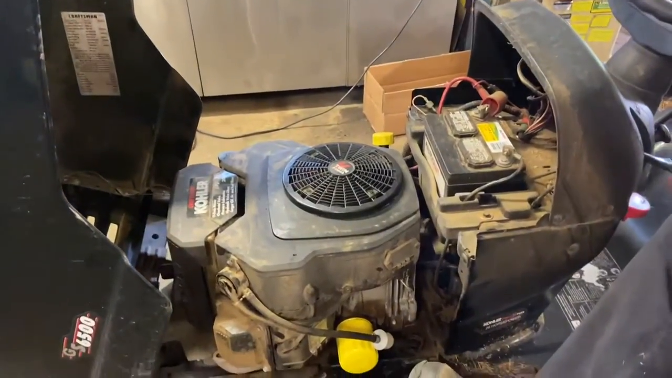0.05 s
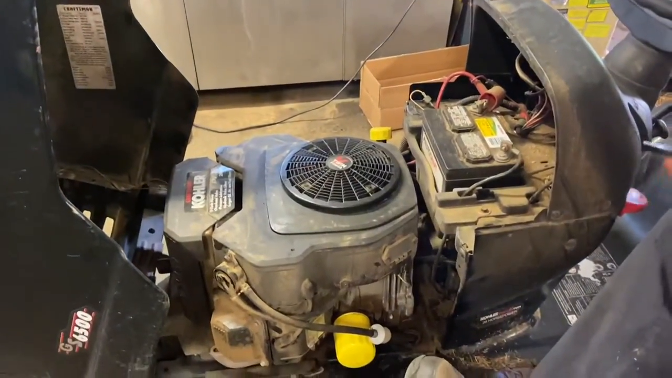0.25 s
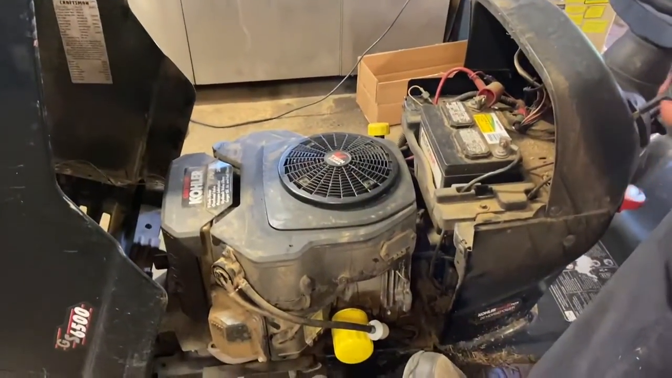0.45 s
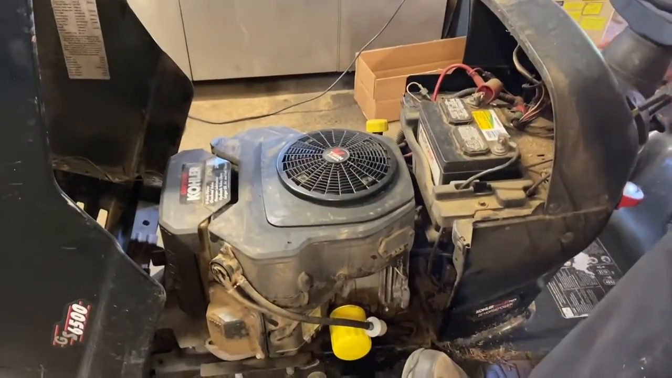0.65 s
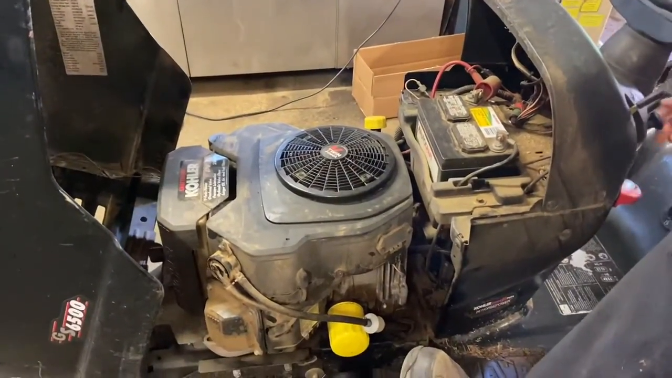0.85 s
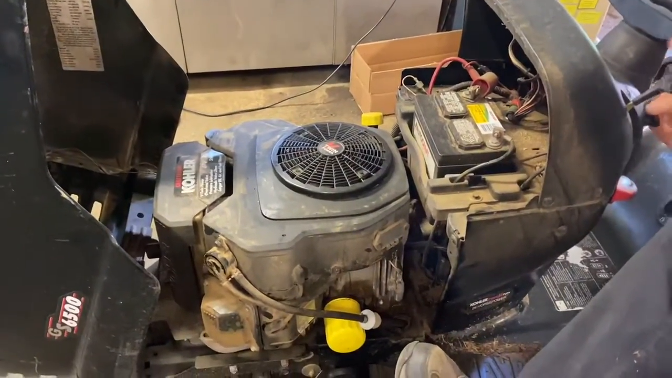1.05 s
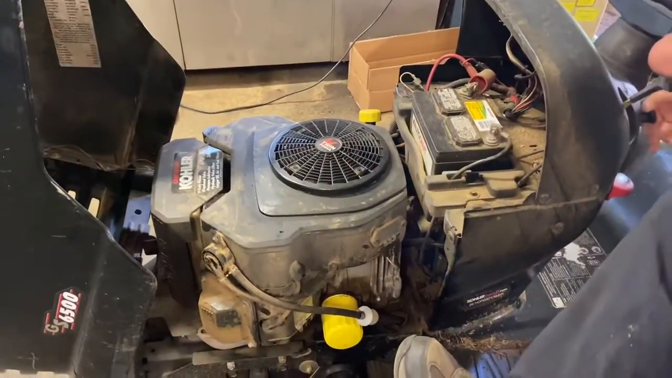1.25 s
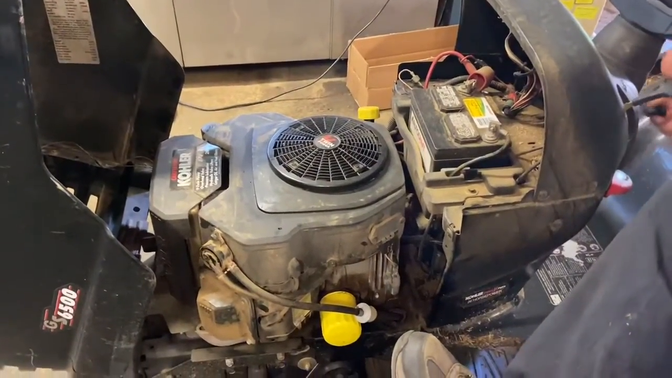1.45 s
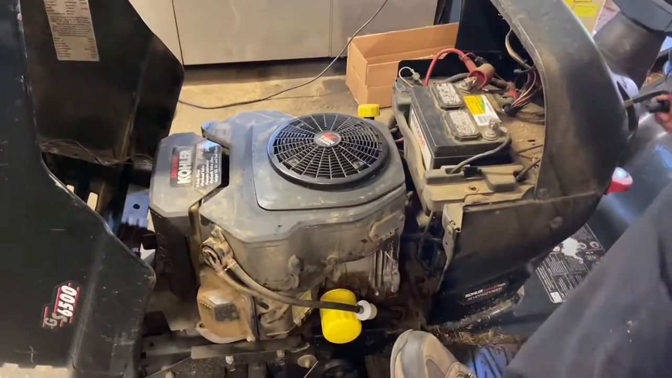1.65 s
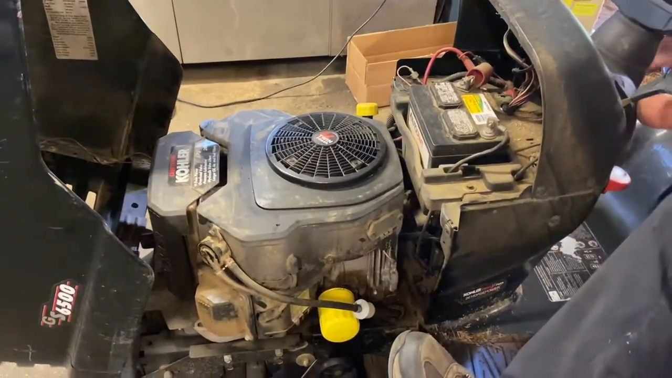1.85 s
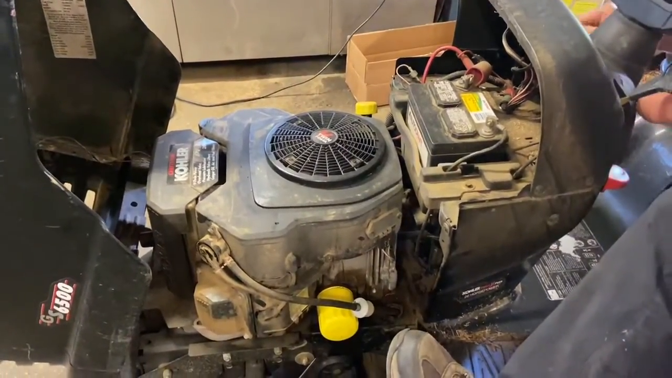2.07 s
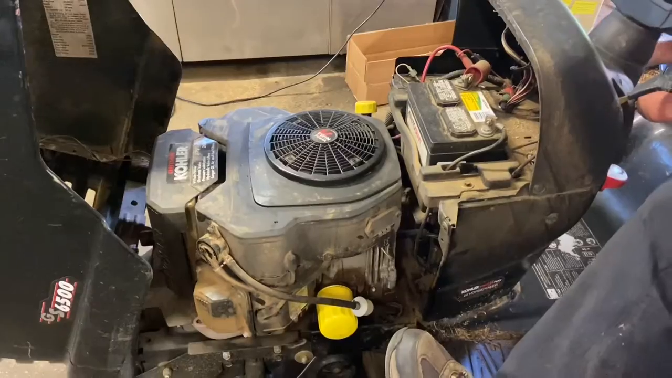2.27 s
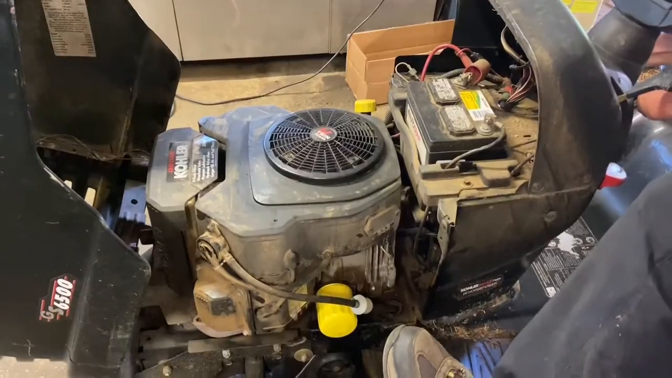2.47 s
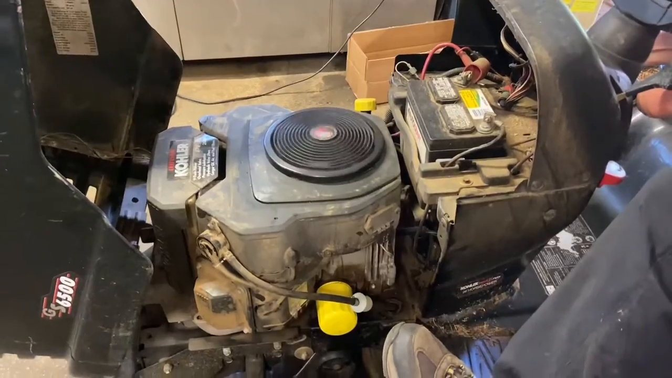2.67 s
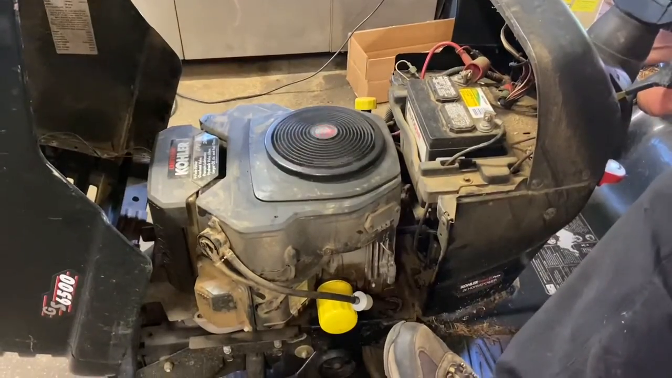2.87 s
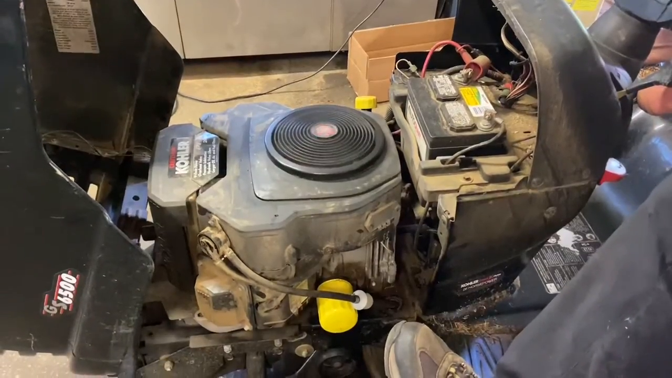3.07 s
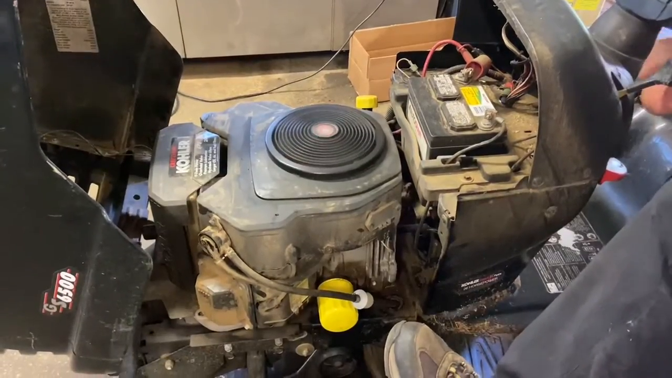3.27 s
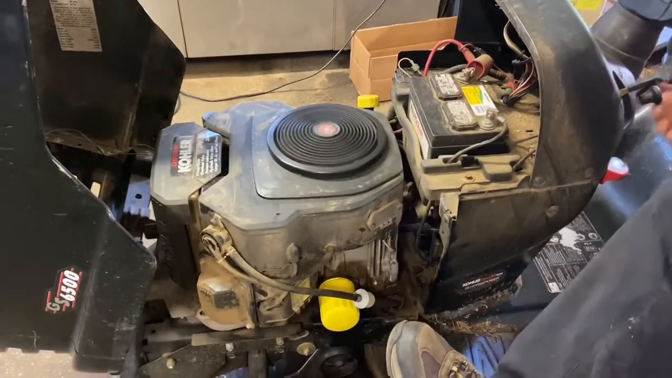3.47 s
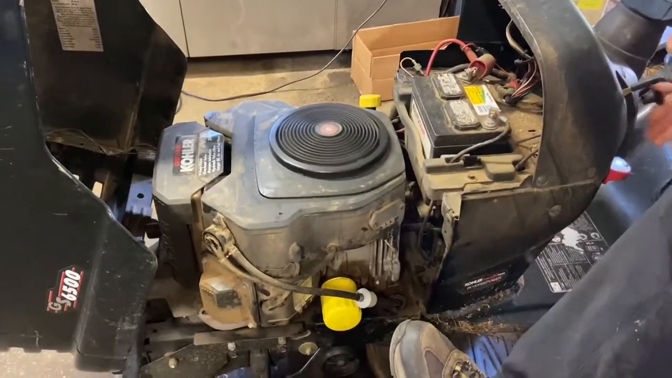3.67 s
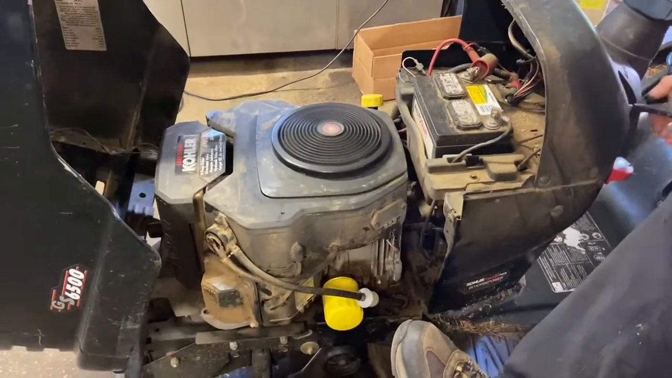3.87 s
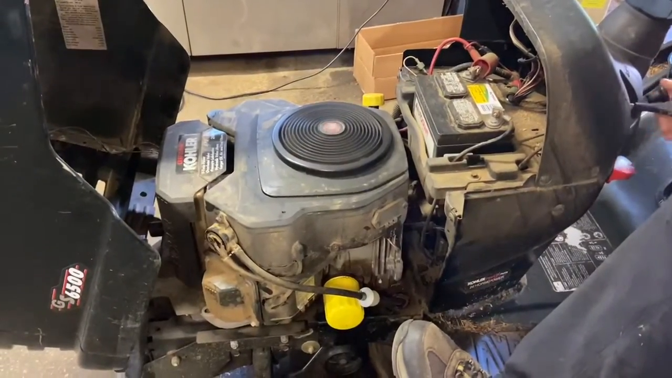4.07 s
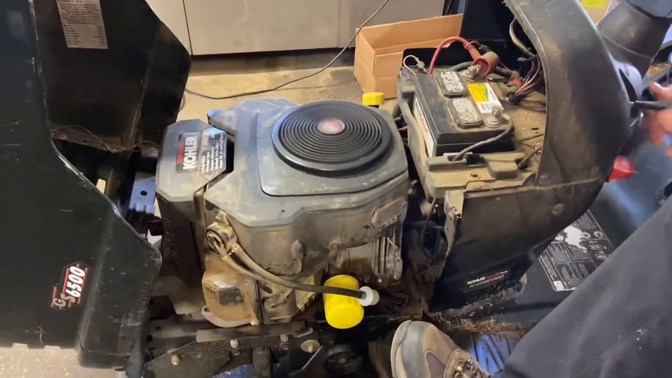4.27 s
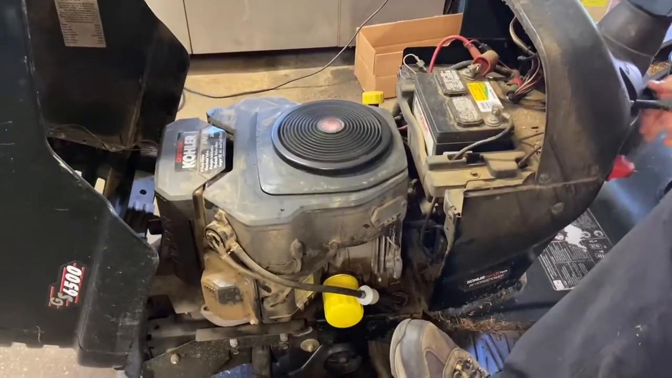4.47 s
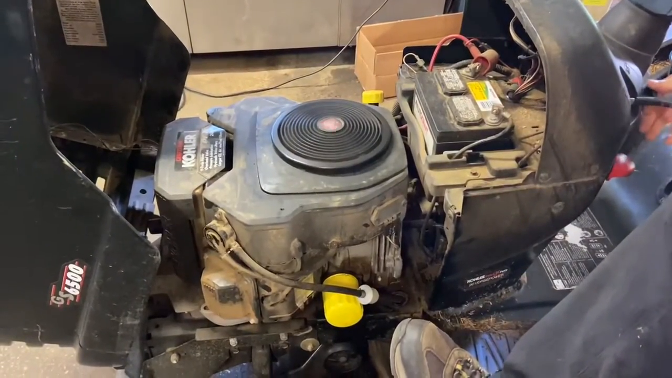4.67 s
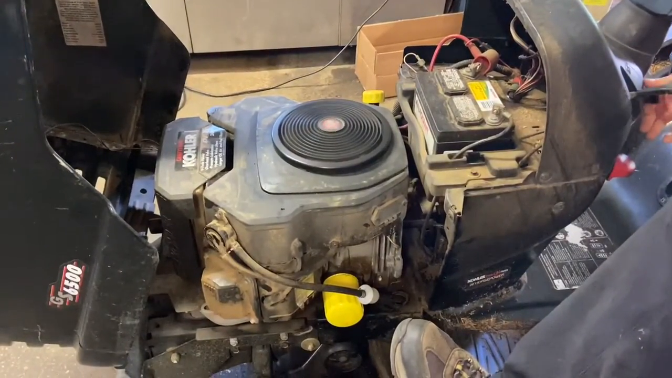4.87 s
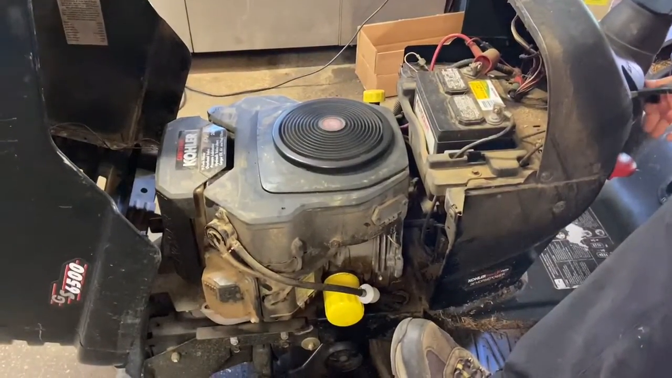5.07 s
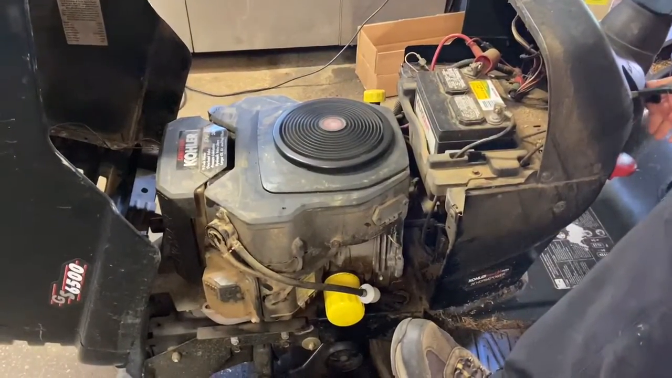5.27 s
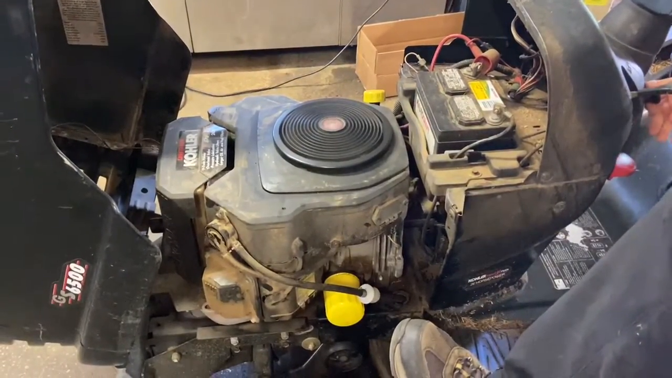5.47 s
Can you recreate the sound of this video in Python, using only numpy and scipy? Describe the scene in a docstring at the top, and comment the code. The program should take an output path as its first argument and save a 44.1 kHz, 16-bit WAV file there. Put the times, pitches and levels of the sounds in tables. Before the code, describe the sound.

After light metal clanks, a riding mower's starter grinds and the engine fires, sags to slow thumps, then speeds up and runs steadily.

```python
"""In a workshop, a V-twin lawn tractor is started, heard from just above the open engine.
Levers and pedal clank, exciting the modes of the frame. The starter's pinion grinds on the ring gear and
rings the flywheel until the engine catches and throws it out. The engine stumbles, slows in separate
thumps with the throttle shut, then the governor opens up, a belt chirps and it runs steadily: pressure
pulses drive the tailpipe, muffler and air box, and valve taps ring the block."""
import sys
import numpy as np
from scipy import signal
from scipy.fft import rfft, irfft
from scipy.io import wavfile
from scipy.ndimage import uniform_filter1d

SR = 44100
rng = np.random.default_rng(int(sys.argv[2]) if len(sys.argv) > 2 else 0)


def log_audio(samples):
    """Write samples as a 16-bit WAV file to the path given in sys.argv[1]."""
    # one column per channel
    frames = np.atleast_2d(samples).T
    # limit to full scale, then quantise
    limited = np.clip(frames, -1, 1)
    pcm = np.round(limited * 32767).astype(np.int16)
    wavfile.write(sys.argv[1], SR, pcm)


N = 243431
T = np.arange(N) / SR
FREQS = np.maximum(np.arange(4097) * SR / 8192, 1)  # frequency axis of all gain curves [Hz]

# Engine speed, `hz` below, counts four-stroke cycles per second. The pinion slips above FREEWHEEL_HZ.
CRANK_HZ, FREEWHEEL_HZ, RUN_HZ = 4, 6.6, 18
PINION_IN_S, PINION_OUT_S = 2.369, 3.2

# Body of the engine block's sound: (frequency [Hz], relative gain [dB])
BLOCK_BODY = [(180, -9), (300, -3.5), (350, -10.5), (428, -4), (525, -8), (756, -8), (1000, -9),
              (1170, -10.5), (1320, -7.5), (1500, -14), (1680, -10), (2120, -16.5), (2310, -16),
              (3000, -26), (3900, -27), (6600, -120)]
# Treble of the engine block's sound: (frequency [Hz], relative gain [dB])
BLOCK_TREBLE = [(2000, -4.5), (2800, -3), (4000, -2.5), (5200, -2), (6200, -1), (7300, -1.5), (10500, -1),
                (15500, -1)]


def exhaust(cycle, hz, throttle, burn, lit):
    """Pulse excitation: two unevenly spaced cylinders drive the tailpipe, muffler and air box."""
    # Strength of the firings at the tailpipe: (time [s], level [dB])
    firing_levels = [(2.85, -36), (2.92, -13), (3.25, -14), (3.42, -10), (3.71, -8.5), (3.76, -18),
                     (4.32, -15), (4.52, -23), (4.6, -15), (4.74, -10.5), (5.52, -12)]
    # Response of the hot muffler: (frequency [Hz], relative gain [dB])
    muffler = [(25, -60.5), (50, -41), (80, 1.5), (108, 6), (155, -3), (198, -0.5), (218, -5), (250, 8),
               (280, -4.5), (325, -10), (370, -16), (425, -14), (600, -19.5), (1200, -35.5)]
    second_phase, pipe_delay_s = .634, 0.00317  # lag of cylinder two [cycles] and of the muffler
    cool_hz, cool_ratio = 12.8, .93  # below this speed, cooler gas lowers the resonances by this ratio
    # a rich mixture makes the second cylinder drop out
    stumble = ramp(3.42, 0.04) - ramp(3.78, 0.04)
    second_db = -2 - 28 * stumble
    # once the governor settles, the air box calms and the leaner mixture quickens the puffs
    settled = ramp(4.79, 0.15)
    throb_db = loudness(hz, throttle, idle_db=-26.5, doubling_db=5.5, drive_db=5.5) - 6 * settled
    bark_db = loudness(hz, burn, idle_db=-36.5, doubling_db=1.5, drive_db=12) - 0.5 * settled
    puff_hz = 124.5 * (np.maximum(hz, FREEWHEEL_HZ) / RUN_HZ) ** 0.11 * (1 + .28 * settled)
    puff_db = curves(firing_levels)[0] - 4 * (1 - lit)
    tailpipe = puffs(cycle, puff_hz, puff_db) + puffs(cycle - second_phase, puff_hz, puff_db + second_db)

    pulse_gain = np.sqrt(SR / np.maximum(hz, 3))  # keeps power independent of pulse rate
    first, second = ticks(cycle, scatter_db=.4), ticks(cycle - second_phase, scatter_db=.5)
    firings = (first + undb(second_db) * second) / np.sqrt(1 + undb(second_db) ** 2)
    cool = shape(np.array(muffler) * [cool_ratio, 1])
    heat = np.clip((hz - cool_hz) / (RUN_HZ - cool_hz), 0, 1)
    bark = morph(-firings * pulse_gain * undb(bark_db), cool, shape(muffler), heat)
    bark = np.interp(T - pipe_delay_s, T, bark)

    pumping = first + undb(0.26 * second_db) * second  # only partly follows the dropout
    air_box = resonances([(74, 29, 0)]) ** 2
    throb = colour(-pumping * pulse_gain * undb(throb_db), air_box)
    return workshop(tailpipe + bark + throb, wet_db=-15)


def puffs(turns, pitch_hz, db):
    """Radiation from an open pipe: one short swing of pressure at every whole turn."""
    delay_s, width_periods, scatter_db = 0.0037, 0.91, 1.2
    out = np.zeros(N)
    age = np.arange(-SR // 50, SR // 50) / SR
    for i in np.flatnonzero(np.diff(np.floor(turns)) > 0):
        periods = pitch_hz[i] * (age - delay_s)
        puff = np.cos(2 * np.pi * periods) * np.exp(-(periods / width_periods) ** 2)
        puff *= undb(db[i] + scatter_db * rng.standard_normal())
        start = i - len(age) // 2
        out[start:start + len(age)] += puff[:N - start]
    return out


def ignition():
    """Incomplete combustion: the share of the charge that lights is 1, except at two misfires."""
    misfires_s, width_s, depth = (3.44, 3.545), 0.047, 0.88
    return 1 - depth * sum(np.exp(-((T - s) / width_s) ** 4) for s in misfires_s)


def valve_gear(cycle, hz, charge, burn):
    """Impact and flow noise: four taps a cycle ring block and covers; gas rushes with each cylinder."""
    # Swells of the gas flow: (phase [cycles], rise [dB])
    gusts = [(.04, 7), (.66, 5.5)]
    # Modes of the valve covers and shroud: (frequency [Hz], bandwidth [Hz], level [dB])
    cover_modes = [(1342, 41, -7), (1421, 33, -1.5), (1642, 42, -11.5), (2235, 31, -11)]
    tap_phases, shake_decay_s, gust_sharpness = (.11, .29, .57, .73), .006, 1.7
    clatter_db = loudness(hz, burn, idle_db=-32, doubling_db=2.5, drive_db=3.5)
    hiss_db = loudness(hz, charge, idle_db=-41, doubling_db=10, drive_db=11.5)
    spun_up = np.clip(hz / 11, 0, 1) ** 2
    taps = sum(ticks(cycle - phase, scatter_db=3.5) for phase in tap_phases)
    shake = 1 + 0.72 * signal.lfilter([1], [1, -np.exp(-1 / (shake_decay_s * SR))], taps)
    rush = undb(sum(db * np.exp(gust_sharpness * (np.cos(2 * np.pi * (cycle - phase)) - 1))
                    for phase, db in gusts))
    shake, rush = (spun_up * v / np.mean(v[T > PINION_OUT_S]) for v in (shake, rush))

    def face():
        """Incoherent radiation: each face of the engine gives its own grainy noise."""
        grit = undb(3.5 * np.repeat(rng.standard_normal(N // 40 + 1), 40)[:N])
        body = colour(unit(noise() * grit) * shake * undb(clatter_db), shape(BLOCK_BODY))
        hiss = colour(unit(noise() * grit) * rush * undb(hiss_db), shape(BLOCK_TREBLE))
        return body + hiss

    blows = spun_up * taps * np.sqrt(SR / (len(tap_phases) * np.maximum(hz, 1)))
    covers = np.zeros(N)
    for mode_hz, width, db in cover_modes:
        pings = np.sign(noise()) * blows * undb(clatter_db + db - 11.5)
        rocking = undb(2.5 * wander(seconds=0.06))  # the engine rocks on its mounts
        covers += colour(pings * rocking, resonances([(mode_hz, width, 0)]))
    top = workshop(face() + covers, wet_db=-5)
    flanks = np.array([face(), face()])  # one to each channel
    return top + undb(-2.5) * flanks


def hood_rattle():
    """Forced vibration: the hard firings of the stumble shake short, bright rattles from the hood."""
    # Jolts of the hood: (time [s], level [dB])
    jolts = [(3.258, -2.5), (3.33, -1.5), (3.362, -3.5), (3.381, -3.5), (3.482, 2), (3.588, -0.5),
             (3.641, 1), (3.691, 0.5)]
    s, db = np.transpose(jolts)
    shake = bursts(s, db, decays_s=0.0085)
    sheet_treble = shape([(2500, -9.5), (4500, -3.5), (8000, -1.0), (15000, 5)])
    body = colour(noise() * shake * undb(-18.5), shape(BLOCK_BODY))
    treble = colour(noise() * shake * undb(-13.5), sheet_treble)
    return workshop(body + treble, wet_db=-4)


def starter(cycle, hz):
    """Gear-mesh noise: pinion teeth strike and scrape the ring gear, slamming as the load reverses."""
    # Slams of the pinion: (time [s], level [dB], decay time [s], relative treble [dB])
    clashes = [(2.378, -10.5, 0.0063, -6), (2.408, -3.5, 0.005, -2), (2.547, -23, .005, -5),
               (2.79, -31, 0.0071, -6), (2.815, -32, 0.012, 13), (2.932, -27, .008, 7),
               (3.006, -11.5, 0.0048, 2), (3.121, -16, 0.0094, 0), (3.183, -14, 0.0065, -2)]
    # Spectrum of scraping teeth: (frequency [Hz], relative gain [dB])
    scrape_spectrum = [(2000, 12), (2800, -12), (3700, 9.5), (5600, 5), (6350, 10), (6650, 9.5),
                       (7100, 12.5), (8000, 1), (10500, -3), (15500, -4)]
    teeth_per_cycle = 190
    grind_db, scrape_db, brush_db = starter_load(hz)
    engaged = np.clip((T - PINION_IN_S) / 0.0013, 0, 1) * np.clip((PINION_OUT_S - T) / 0.0015, 0, 1)
    mesh_hz = teeth_per_cycle * np.maximum(hz, 2)
    # backlash lets each tooth land early or late, so the mesh grinds
    backlash = unit(uniform_filter1d(uniform_filter1d(noise(), 100), 100))
    teeth = ticks(teeth_per_cycle * cycle + .45 * backlash, scatter_db=3) * np.sqrt(SR / mesh_hz)
    chatter = flutter(spread_db=2, samples=220)  # the pinion moves in and out of contact
    mesh = (.5 * teeth + .75 * noise()) * chatter

    s, db, decay_s, treble_db = np.transpose(clashes)
    force = mesh * engaged * undb(grind_db) + noise() * bursts(s, db, decay_s)
    friction = unit(mesh * np.sqrt(chatter)) * engaged * undb(scrape_db + 2.5 * wander(seconds=.012))
    scrape = colour(friction, shape(scrape_spectrum))
    crack = noise() * bursts(s, db + treble_db, decay_s)
    grind = flywheel(force)
    pulling = engaged * (T > s[1])  # from the second slam on
    whine = gear_whine(backlash) * chatter * pulling
    brushes = noise() * chatter * engaged * undb(brush_db)
    hiss = colour(brushes + crack, shape(BLOCK_TREBLE))
    return workshop(grind + scrape + whine + hiss, wet_db=-6)


def starter_load(hz):
    """Contact noise grows with speed, in the gears also with load: grind, scrape and brushes in dB."""
    # The load builds and lets go: (time of peak [s], rise [dB])
    surges = [(2.451, 4.5), (2.592, 3), (2.714, 1), (2.872, 2)]
    build_s, release_s = 0.052, 0.0085
    doublings = np.log2(np.clip(hz, 2, FREEWHEEL_HZ) / CRANK_HZ)
    surge_db = sum(db * np.exp(-((T - s) / np.where(T < s, build_s, release_s)) ** 2) for s, db in surges)
    grind_db = -24 + 1.5 * doublings + surge_db
    scrape_db = -30 + 6 * doublings + 0.87 * surge_db
    brush_db = -36 + 16 * doublings
    return grind_db, scrape_db, brush_db


def flywheel(force):
    """Modal response: the flywheel's ring wavers as the teeth load different parts of its rim."""
    # Modes of the flywheel and its shroud: (frequency [Hz], bandwidth [Hz], relative gain [dB])
    modes = np.array([(392, 92, -8), (603, 60, -8), (750, 110, -2), (903, 50, 0), (1330, 160, 5),
                      (1450, 150, 9), (1662, 90, 6), (1860, 210, 2), (2185, 260, 2.5)])
    detune = .035
    tilt = shape([(120, 11), (300, 10), (2100, -11), (3000, -12)])
    low, high = (resonances(modes * [1 + way * detune, 1, 1]) * tilt for way in (-1, 1))
    waver = np.clip(.5 + wander(seconds=.07), 0, 1)
    return undb(-0.5) * morph(force, low, high, waver)


def gear_whine(backlash):
    """Tooth-rate tone: it sags under each compression, and backlash modulates its phase."""
    # Course of the whine: (time [s], frequency [Hz], level [dB])
    course = [(2.41, 356, -19), (2.49, 440.5, -34), (2.54, 444, -35), (2.59, 463, -25.5), (2.635, 374, -33),
              (2.67, 434, -55), (2.70, 675, -29.5), (2.725, 567.4, -22.5), (2.76, 580, -37),
              (2.795, 712, -32), (2.825, 688, -57), (2.855, 770, -26), (2.878, 899, -20), (2.92, 909, -53)]
    pitch_hz, db = curves(course)
    teeth_passed = np.cumsum(pitch_hz) / SR + 0.12 * backlash
    return undb(db) * np.sin(2 * np.pi * teeth_passed)


def metal_notes():
    """Resonance: rough notes swell from the flywheel as the starter grinds, later faintly the shroud."""
    # Notes: (time of peak [s], frequency [Hz], level [dB], half length [s], phase roughness [rad])
    notes = [(2.581, 1430, -15, 0.018, 1.04), (2.651, 1420, -24, .024, 0.69),
             (2.873, 1390, -17.5, 0.014, 0.86), (3.188, 1545, -13.5, 0.012, 1.1),
             (4.324, 1330, -35.5, 0.067, 0.77), (5.156, 1330, -29, 0.029, .6)]
    out = np.zeros(N)
    for s, hz, db, half_s, roughness in notes:
        swell = undb(db) * np.exp(-((T - s) / half_s) ** 2)
        out += swell * np.sin(2 * np.pi * hz * T + roughness * wander(seconds=.003))
    return workshop(out, wet_db=-13)


def controls():
    """Impact excitation: levers, pedal and key tick, ring the frame and linkage, and boom the panels."""
    # Clanks: (time [s], level [dB], relative treble [dB], relative ring [dB], decay time [s])
    clanks = [(0.135, -33, -2, -2, 0.0075), (0.275, -38.5, -2.5, -2, 0.011), (0.309, -25, -3.5, -2, 0.011),
              (0.419, -41.5, -26, -7, 0.018), (0.495, -24.5, -15, -4.5, 0.0039),
              (0.513, -48, -18, 0, 0.0079), (0.95, -42.5, -7.5, 3, 0.024), (1.093, -38.5, -13, -9, 0.011),
              (1.284, -38, -13, -1, 0.0069), (1.341, -37, -9, -11, 0.026), (1.382, -33, 0, -6, 0.011),
              (1.442, -38, -17, -7, 0.015), (1.613, -45.5, -15, 1, 0.017), (1.82, -32, -22, -2, 0.0083),
              (1.895, -41, -8, -6, 0.033), (1.95, -42.5, -26, -6, 0.022), (2.032, -50.5, -30, 3, 0.019),
              (2.217, -48, -14, -1, 0.021), (2.266, -25.5, -21, -2, 0.017), (2.277, -36, -1, -4, 0.0047),
              (2.307, -28, -10.5, -8, 0.0088)]
    # Modes of the frame: (frequency [Hz], relative gain [dB], T60 [s])
    frame_modes = [(239, 1.5, 0.044), (326.5, 6, 0.17), (385, 8, 0.36), (599, -1, 0.091), (750, 3, 1)]
    # Spectrum of a knock: (frequency [Hz], relative gain [dB])
    knock_spectrum = [(300, -5.5), (600, 9.5), (1150, 0.5), (1600, -0.5), (2300, -4), (3300, -13),
                      (5000, -18)]
    s, db, treble_db, ring_db, decay_s = np.transpose(clanks)
    # after each clank the loose linkage jiggles on
    loose = flutter(spread_db=6, samples=300)
    jiggle_db, jiggle_s = -55 + .3 * (db - np.mean(db)), 0.068
    force = noise() * (bursts(s, db - 3, decay_s) + loose * bursts(s, jiggle_db, jiggle_s))
    treble_jiggle = loose * bursts(s, jiggle_db + treble_db, jiggle_s)
    click = noise() * (bursts(s, db + treble_db, 0.69 * decay_s) + treble_jiggle)
    frame = resonances([(hz, np.log(1000) / np.pi / t60, level) for hz, level, t60 in frame_modes])
    knock = colour(force, shape(knock_spectrum)) + undb(-5) * colour(force, frame)
    tick = colour(click, shape([(3000, -0.34), (8000, 0.19), (15500, -1.7)]))
    ring = linkage(s, db + ring_db - 17)
    return workshop(knock + tick + ring, wet_db=-4.5) + workshop(panel_booms(), wet_db=-14)


def linkage(times, dbs):
    """Free vibration: damped steel modes, struck a little differently by every blow."""
    # Modes of the linkage: (frequency [Hz], relative level [dB], T60 [s])
    steel_modes = [(897, -7.5, 0.21), (1116, 9.5, 0.076), (1207, 5, 0.087), (1359, 1.5, 0.079),
                   (1525, 7, 0.085), (1850, 1, 0.081), (2320, -3, 0.053), (4780, -24, 0.083)]
    scatter_db, detune, attack_s = 3.5, .035, 0.003
    out = np.zeros(N)
    age = T[:SR // 3]
    hz, mode_db, t60 = np.transpose(steel_modes)[:, :, None]
    for s, db in zip(times, dbs):
        pitch_draw, level_draw = rng.standard_normal((2, len(hz), 1))
        envelopes = undb(db + mode_db + scatter_db * level_draw) * decay(age, t60)
        modes = envelopes * np.sin(2 * np.pi * hz * (1 + detune * pitch_draw) * age)
        signs = rng.choice([-1, 1], len(hz))
        i = int(s * SR)
        out[i:i + len(age)] += signs @ modes * (1 - np.exp(-age / attack_s))
    return out


def panel_booms():
    """Damped resonance: each body panel takes a moment to swing up, then dies away on one hollow note."""
    # Booms under the clanks: (time [s], frequency [Hz], level [dB])
    booms = [(0.312, 242, -53), (0.32, 317, -40), (0.504, 385.6, -36), (0.968, 382, -43), (1.346, 323, -37),
             (1.637, 268, -41), (1.823, 336, -41), (2.272, 374.6, -30), (2.294, 258, -34)]
    build_s, t60_s = .012, .32
    out = np.zeros(N)
    for s, hz, db in booms:
        age = np.maximum(T - s, 0)
        swing = np.sin(2 * np.pi * hz * age + .8 * wander(seconds=.012))
        out += undb(db) * swing * (1 - np.exp(-age / build_s)) * decay(age, t60_s)
    return out


def belt():
    """Stick-slip friction: the belt gives a thin, unsteady squeal on its pulley as the engine picks up."""
    grip = flutter(spread_db=2, samples=400)
    slip = (ramp(4.67, .06) - ramp(4.9, .06)) * undb(-47.5) * grip
    squeal = colour(noise() * slip, resonances([(5220, 320, 0)]) ** 2)
    return workshop(squeal, wet_db=-4)


def workshop(x, wet_db):
    """Reverberation: direct sound, slightly later on the right, and a diffuse tail alike in the bass."""
    # Reverberation time of the room: (frequency [Hz], T60 [s])
    room_t60 = [(150, 0.93), (600, 0.19), (2000, 0.22), (5000, 0.25), (12000, 0.049)]
    right_lag_s = 1.14 / SR
    age = T[:SR // 2]
    hz = np.maximum(np.arange(len(age) // 2 + 1) * SR / len(age), 1)
    centres, t60s = np.transpose(room_t60)
    mid, side = rfft(rng.standard_normal((2, len(age))))
    side = side * np.minimum(hz / 550, 1)
    diffuse = np.array([mid + side, mid - side]) / np.sqrt(2)
    bands = [np.interp(np.log(hz), np.log(centres), row) for row in np.eye(len(t60s))]
    tail = sum(irfft(diffuse * band, len(age)) * decay(age, t60) for band, t60 in zip(bands, t60s))
    tail = tail * undb(wet_db) / np.sqrt(np.sum(tail ** 2) / 2)
    direct = np.array([x, np.interp(T - right_lag_s, T, x)])
    reverb = signal.fftconvolve(x[None], tail, axes=1)[:, :N]
    return (direct + reverb) / np.sqrt(1 + undb(wet_db) ** 2)


def shop_air():
    """Ambient noise: the low, steady rumble of the building, with a faint hiss."""
    # Spectrum of the background: (frequency [Hz], relative gain [dB])
    spectrum = [(15, -102), (25, -25), (55, 7), (90, -3.5), (190, -7.5), (439, -13.5), (503, -16),
                (659, -24.5), (1190, -24.5), (4250, -51.5), (6920, -40.5), (8830, -64), (11000, -35.5),
                (16000, -66)]
    mid = colour(noise(), shape(spectrum))
    side = colour(noise(), shape(spectrum) * np.minimum(FREQS / 900, 1))
    return undb(-51.5) * (mid + undb(-12) * side * np.array([[1], [-1]]))


def loudness(hz, drive, idle_db, doubling_db, drive_db):
    """Level law: idle_db undriven at running speed, plus terms for doublings of speed and for drive."""
    return idle_db + doubling_db * np.log2(np.maximum(hz, 1) / RUN_HZ) + drive_db * drive


def undb(db):
    """Decibels to amplitude gain."""
    return 10 ** (np.asarray(db) / 20)


def unit(x):
    """Normalisation to rms 1."""
    return x / np.sqrt(np.mean(x ** 2))


def curves(table):
    """Linear interpolation of a table's columns over the times in its first."""
    s, *columns = np.transpose(table)
    return [np.interp(T, s, c) for c in columns]


def ramp(centre_s, length_s):
    """Linear rise from 0 to 1, half way at centre_s."""
    return np.clip((T - centre_s) / length_s + .5, 0, 1)


def decay(age, t60):
    """Exponential damping by 60 dB in t60 seconds."""
    return np.exp(-np.log(1000) * age / t60)


def noise():
    """White Gaussian noise."""
    return rng.standard_normal(N)


def wander(seconds):
    """Low-passed noise: a random drift of rms 1."""
    size = max(int(seconds * SR), 2)
    return unit(uniform_filter1d(uniform_filter1d(noise(), size), size // 2))


def flutter(spread_db, samples):
    """Log-normal amplitude modulation of rms 1, smoothed over this many samples."""
    return unit(undb(spread_db * unit(uniform_filter1d(noise(), samples))))


def ticks(turns, scatter_db):
    """Impulse train: a pulse of uneven size at every whole turn."""
    at = np.flatnonzero(np.diff(np.floor(turns)) > 0)
    out = np.zeros(N)
    out[at] = undb(scatter_db * rng.standard_normal(len(at)))
    return out


def bursts(times, dbs, decays_s):
    """Impact envelopes with decay times of at least 5 ms; a longer blow also starts more softly."""
    out = np.zeros(N)
    age = T[:SR // 4]
    for s, db, decay_s in np.broadcast(times, dbs, np.maximum(decays_s, .005)):
        blow = undb(db) * (1 - np.exp(-4 * age / decay_s)) ** 2 * np.exp(-age / decay_s)
        i = int(s * SR)
        out[i:i + len(age)] += blow[:N - i]
    return out


def shape(points):
    """Gain curve through (frequency [Hz], gain [dB]) points, rolling off beyond the ends."""
    hz, db = np.transpose(points)
    octaves_outside = np.maximum(np.log2(hz[0] / FREQS), 0) + np.maximum(np.log2(FREQS / hz[-1]), 0)
    return undb(np.interp(np.log(FREQS), np.log(hz), db) - 26.4 * octaves_outside)


def resonances(peaks):
    """Gain curve of (frequency [Hz], bandwidth [Hz], gain [dB]) resonators, summed in power."""
    return np.sqrt(sum(undb(db) ** 2 / (1 + ((FREQS ** 2 - hz ** 2) / (FREQS * width)) ** 2)
                       for hz, width, db in peaks))


def colour(x, gain):
    """Minimum-phase filter of unit energy with the shape of this gain curve."""
    cepstrum = irfft(np.log(gain + 1e-6))
    half = len(cepstrum) // 2
    cepstrum[1:half] *= 2
    cepstrum[half + 1:] = 0
    response = irfft(np.exp(rfft(cepstrum)))
    return signal.fftconvolve(x, response / np.linalg.norm(response))[:N]


def morph(x, gain_from, gain_to, share):
    """Square-root crossfade between two filters."""
    return colour(x * np.sqrt(1 - share), gain_from) + colour(x * np.sqrt(share), gain_to)


def scene():
    """Superposition of all sources; the crankshaft's angle times the firings, valve taps and teeth."""
    # Engine speed: (time [s], four-stroke cycle rate [Hz])
    speed = [(2.38, 0), (2.5, 2.26), (2.89, 4.14), (2.945, 10.1), (3.25, 19.65), (3.74, 18.95),
             (4.25, 12.58), (4.57, 10.07), (4.7, 16), (4.95, 17.95), (5.52, 18.06)]
    # The governor's hold on the throttle: (time [s], opening [0-1])
    openings = [(2.86, 0), (2.95, 1), (3.25, 0.52), (3.71, 0.12), (3.75, 0.1), (4.57, 0), (4.59, 0.86),
                (4.69, 0.96), (4.95, 0.35), (5.52, 0.41)]
    full_burn = 0.22  # charge from which the burn is at full strength
    hz, = curves(speed)
    cycle = np.cumsum(hz) / SR
    throttle, = curves(openings)
    lit = ignition()
    charge = throttle * lit
    burn = np.minimum(charge / full_burn, 1)
    engine = exhaust(cycle, hz, throttle, burn, lit) + valve_gear(cycle, hz, charge, burn) + hood_rattle()
    return engine + starter(cycle, hz) + metal_notes() + belt() + controls() + shop_air()


def record(dry):
    """Soft saturation rounds the highest peaks; filters notch the treble twice and cut the top."""
    # Stop bands: (lower edge [Hz], upper edge [Hz])
    notches = [(8500, 9600), (12650, 13750)]
    top_hz = 16000
    out = np.tanh(0.76 * dry) / 0.64
    for band in notches:
        out = signal.sosfilt(signal.butter(4, band, "bandstop", fs=SR, output="sos"), out)
    return signal.sosfilt(signal.ellip(8, .2, 70, top_hz, fs=SR, output="sos"), out)


dry = scene()
out = record(dry)
log_audio(out)
```